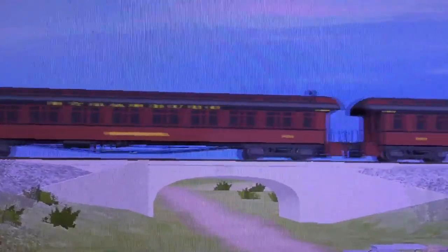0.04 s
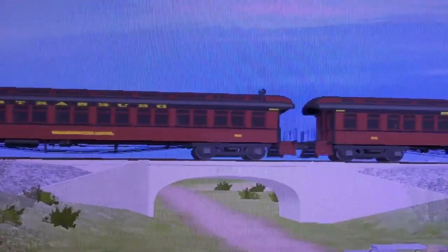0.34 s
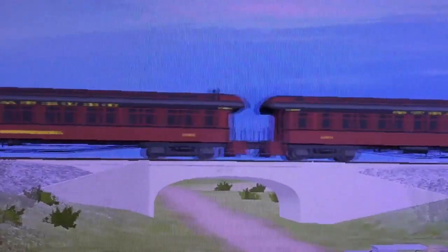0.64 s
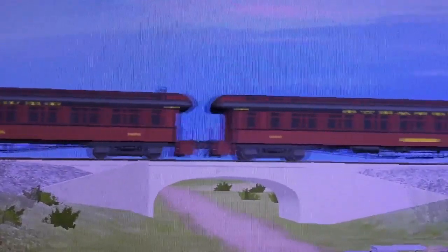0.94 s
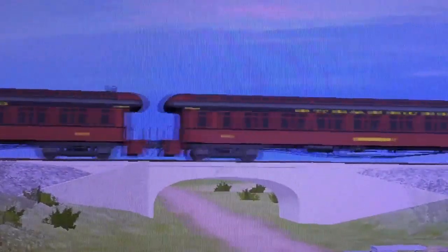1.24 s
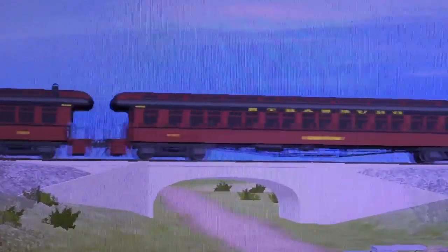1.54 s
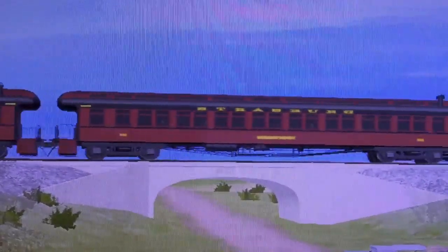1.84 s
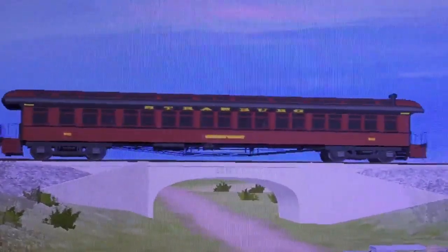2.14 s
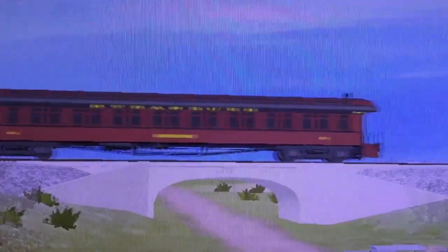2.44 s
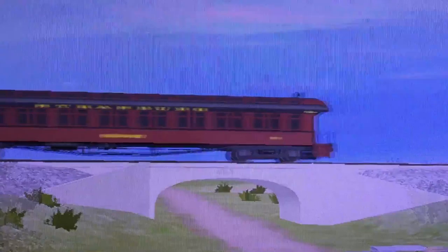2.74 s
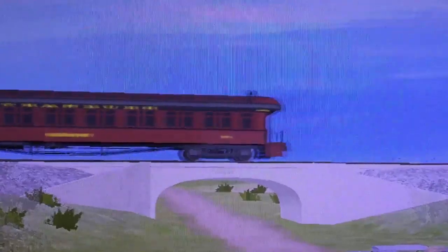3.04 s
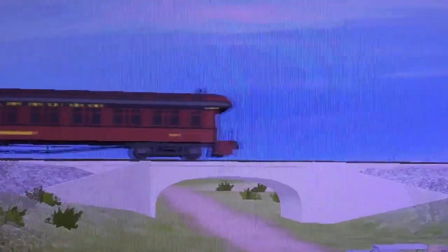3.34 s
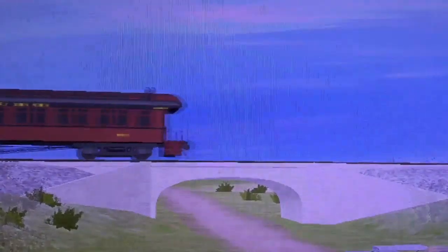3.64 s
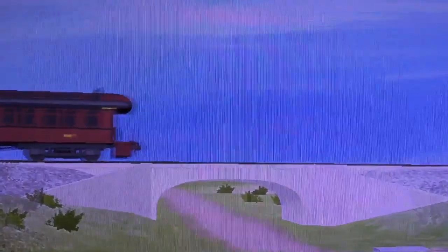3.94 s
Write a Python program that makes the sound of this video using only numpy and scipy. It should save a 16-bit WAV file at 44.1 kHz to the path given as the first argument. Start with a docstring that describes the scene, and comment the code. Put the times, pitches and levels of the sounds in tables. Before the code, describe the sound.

A model train rolls steadily along its track indoors, small bumps making the hollow baseboard drum and boom in a repeating rhythm. Wheels chatter and rails hiss in surges, with occasional light clunks and faint scrapes.

```python
"""A model train rolls steadily indoors, its small bumps making the hollow baseboard drum and boom.
The running gear repeats every 1.14 s: a fixed run of bumps and booms, and eight surges of contact force.
The surges drive board growl, wheel chatter and ringing, and rail hiss. Flanges scrape and car bodies
clunk now and then. A faint motor hum, a rumble and a steady hiss lie underneath."""
import sys
import numpy as np
from scipy import signal
from scipy.fft import rfft, irfft
from scipy.io import wavfile
from scipy.ndimage import uniform_filter1d

SR = 44100
rng = np.random.default_rng(int(sys.argv[2]) if len(sys.argv) > 2 else 0)


def generate_wav(signal):
    """Clip the signal to [-1, 1] and save it as 16-bit WAV at the path in sys.argv[1]."""
    frames = np.transpose(np.atleast_2d(signal))
    scaled = np.clip(frames, -1, 1) * 32767
    pcm = np.round(scaled).astype(np.int16)
    wavfile.write(sys.argv[1], SR, pcm)


N = 176400
T = np.arange(N) / SR
CYCLE_S = 1.13871


def amp(db):
    """Decibels to gain."""
    return 10 ** (np.asarray(db) / 20)


def unit(x):
    """Scale to unit rms."""
    return x / np.sqrt(np.mean(x ** 2) + 1e-20)


def add(mix, start_s, sound):
    """Mix a sound in at start_s."""
    part = mix[max(round(start_s * SR), 0):][:len(sound)]
    part += sound[:len(part)]


def colour(x, points):
    """Filter by (freq_hz, gain_db) points on a log-frequency axis; unit rms."""
    hz, db = np.transpose(points)
    log_freq = np.log(np.fft.rfftfreq(N, 1 / SR) + 1)
    return unit(irfft(rfft(x) * amp(np.interp(log_freq, np.log(hz), db)), N))


def resonate(x, modes):
    """Bank of narrow resonances, alternating in sign; unit rms."""
    f = np.fft.rfftfreq(N, 1 / SR) + 1
    response = sum((-1) ** k * amp(db) / (1 + 1j * (f * f - hz * hz) / (f * width_hz))
                   for k, (hz, width_hz, db) in enumerate(modes))
    return unit(irfft(rfft(x) * response, N))


def swell(dt, rise_s, fall_s):
    """Two-sided Gaussian, peak at dt = 0."""
    return np.exp(-.5 * (dt / np.where(dt < 0, rise_s, fall_s)) ** 2)


def cycle_offset_s(at_s):
    """Signed time from the nearest repeat of at_s."""
    return (T - at_s + CYCLE_S / 2) % CYCLE_S - CYCLE_S / 2


def flutter(depth_db, length_s):
    """Randomly wandering gain."""
    return amp(depth_db * unit(uniform_filter1d(rng.standard_normal(N), round(length_s * SR))))


def blow(modes, rise_s):
    """One soft blow on damped modes; unit peak."""
    t = T[:SR // 5]
    wave = sum(amp(db - 60 * t / t60_s) * np.sin(2 * np.pi * hz * t) for hz, db, t60_s in modes)
    wave *= 1 - np.exp(-(t / rise_s) ** 2)
    return wave / abs(wave).max()


def jangle(x, share=.5, t60_s=.06):
    """Many small metal parts ring briefly with the contact noise."""
    t = T[:SR // 8]
    tail = rng.standard_normal(len(t)) * amp(-60 * t / t60_s)
    ringing = signal.fftconvolve(x, tail / np.linalg.norm(tail))[:N]
    return np.sqrt(1 - share) * x + np.sqrt(share) * ringing


def roughness(repeat):
    """Contact noise: the repeat share of its power recurs each cycle, the rest is new."""
    worn = np.resize(rng.standard_normal(round(CYCLE_S * SR)), N)
    return np.sqrt(repeat) * worn + np.sqrt(1 - repeat) * rng.standard_normal(N)


def contact_force(column, rest_db, lag_s):
    """Eight surges per cycle over a steady rest level."""
    # force surges: peak_s, growl_db, chatter_db, hiss_db
    surges = [(0.135, -10, -0.5, -1.5), (0.27, -1.5, -2, -3), (0.426, 4, -2.5, -2), (0.555, -1.5, -0.5, 0),
              (0.7, 4, -1, -0.5), (0.841, -11, -2.5, -1.5), (0.984, 4, -0.5, 0), (1.134, 4, -1, -1.5)]
    index = {"growl": 1, "chatter": 2, "hiss": 3}[column]
    power = amp(rest_db) ** 2
    for row in surges:
        surge = swell(cycle_offset_s(row[0] + lag_s), rise_s=.021, fall_s=.04)
        power = power + amp(row[index]) ** 2 * surge
    return np.sqrt(power)


def background_hiss():
    """Faint steady hiss."""
    # hiss spectrum: freq_hz, gain_db
    spectrum = [(100, 12), (1000, 12), (2500, 11), (5000, 7), (7500, 1), (9500, 3), (10600, -3),
                (13000, -7), (15500, -15)]
    return amp(-72.5) * colour(rng.standard_normal(N), spectrum)


def motor_hum(pitch_hz=55.64, rms_db=-61):
    """The motor hums on one low sine."""
    return amp(rms_db) * np.sqrt(2) * np.sin(2 * np.pi * (pitch_hz * T + rng.random()))


def flange_scrapes():
    """Short bright bursts where a flange bites the rail."""
    # flange bites: peak_s, level_db
    bites = [(.54, -66), (.71, -75), (1.152, -71), (1.296, -67), (1.677, -66), (2.13, -70), (2.284, -73),
             (2.82, -66), (2.97, -72), (3.421, -68), (3.585, -68)]
    # scrape spectrum: freq_hz, gain_db
    spectrum = [(2500, -20), (3800, 3), (4600, 3), (5900, 7), (7100, -8), (7700, -16), (9500, -18),
                (12000, -38)]
    envelope = sum(amp(db) * swell(T - peak_s, rise_s=.009, fall_s=.018) for peak_s, db in bites)
    return envelope * colour(rng.standard_normal(N), spectrum)


def rails():
    """Metal rubs on metal: gritty hiss, and a different few rail modes chink in each surge."""
    # rubbing spectrum: freq_hz, gain_db
    spectrum = [(1000, -14.5), (1900, 2.5), (2400, 2), (2900, -2), (3600, -3), (4400, -7), (5000, -13.5),
                (6000, -16), (7000, -19.5), (7550, -24.5), (8100, -24.5), (9500, -22.5), (10600, -32),
                (15500, -52.5)]
    # rail modes: pitch_hz, bandwidth_hz, gain_db
    modes = [(2417, 7.8, -3.5), (2703, 53, 3.5), (3160, 26, -14), (3363, 55, 2.5), (3740, 28, -5),
             (3963, 42, -1.5), (4270, 99, -9.5), (5460, 53, -6.5), (5880, 33, -8.5), (6300, 42, -16),
             (7060, 58, -12.5)]
    rub = contact_force("hiss", rest_db=-3, lag_s=0.00086) * flutter(depth_db=2.27, length_s=0.0069)
    hiss = colour(jangle(rng.standard_normal(N) * rub), spectrum)
    force = contact_force("hiss", rest_db=-16, lag_s=-0.0032)
    chinks = 0
    for hz, width_hz, db in modes:
        drive = force * flutter(depth_db=3.2, length_s=.04) * rng.standard_normal(N)
        chinks = chinks + amp(db) * resonate(drive, [(hz, width_hz, 0)])
    return amp(-59) * hiss + amp(-63.5) * unit(chinks)


def rubbed_notes(trim_db=-1):
    """Now and then a wheel or rail is rubbed into one short, rasping note."""
    # wheel and rail notes: peak_s, pitch_hz, level_db
    notes = [(.015, 5538, -70), (.04, 1348, -50.5), (.429, 5415, -71), (.554, 1232, -54), (0.56, 1620, -51),
             (0.709, 1288, -54), (0.724, 3978, -68), (.728, 3353, -64), (.838, 3950, -69),
             (0.879, 3350, -62), (.973, 3330, -64), (.985, 2648, -63), (1.008, 1262, -51),
             (1.122, 1232, -52), (1.126, 1342, -48.5), (1.138, 5400, -73), (1.32, 1366, -52),
             (1.555, 1225, -65), (1.566, 5450, -72), (1.577, 4000, -72), (1.683, 5440, -76),
             (1.701, 1620, -47.5), (1.751, 3396, -65), (1.861, 3972, -65), (1.866, 3400, -69),
             (2.015, 3270, -68), (2.135, 1362, -56), (2.145, 3380, -63), (2.266, 1343, -51),
             (2.27, 1258, -49.5), (2.284, 5437, -68), (2.306, 1442, -49), (2.305, 2617, -58.5),
             (2.469, 1345, -53), (2.515, 2468, -61), (2.839, 1642, -51.5), (2.998, 3983, -71),
             (3.165, 3383, -66), (3.285, 3440, -71), (3.397, 1345, -53), (3.401, 2550, -63),
             (3.406, 1252, -49), (3.418, 5460, -69), (3.587, 5426, -78), (3.837, 1222, -58),
             (3.841, 5330, -70), (3.975, 1627, -52)]
    out = np.zeros(N + SR)  # 1 s lead-in
    dt = T[:SR // 4] - .1
    envelope = swell(dt, rise_s=.02, fall_s=.027)
    for peak_s, hz, db in notes:
        tone = np.sqrt(2) * np.sin(2 * np.pi * (hz * dt + rng.random()))
        add(out, 1 + peak_s + dt[0], amp(db + trim_db) * envelope * tone)
    return out[SR:] * unit(flutter(depth_db=3, length_s=0.0033))


def wheels():
    """Wheels chatter and ring with each surge."""
    # chatter spectrum: freq_hz, gain_db
    spectrum = [(450, -4), (700, -8.5), (830, -8.5), (1000, -6), (1120, -3.5), (1250, -7.5), (1500, -0.5),
                (1750, -4.5), (2100, -8), (2600, -20.5), (5000, -54)]
    # wheel modes: pitch_hz, bandwidth_hz, gain_db
    modes = [(640, 30, -7), (830, 60, -8), (975, 25, -9), (1058, 14, -7), (1235, 45, 0), (1346, 9, 5),
             (1457, 18, 2), (1635, 24, -5), (1833, 12, -11), (2048, 14, -9)]
    drive = roughness(repeat=0.51) * contact_force("chatter", rest_db=-7, lag_s=-0.0028)
    chatter = colour(jangle(drive), spectrum)
    ringing = resonate(roughness(repeat=0.96), modes)
    ringing *= contact_force("chatter", rest_db=-9, lag_s=0.0014)
    return amp(-50) * chatter + amp(-53.5) * unit(ringing)


def car_clunks():
    """Occasional hollow knocks of a car body."""
    # car body modes: pitch_hz, gain_db, t60_s
    modes = [(470.5, -1.5, 0.12), (538, -1, 0.16), (574.6, -0.5, 0.084), (625, -3.5, .12),
             (848, -17.5, 0.082)]
    # clunks: start_s, peak_db
    clunks = [(0.04, -39.5), (1.246, -34), (1.895, -40.5), (2.275, -38), (3.24, -39), (3.534, -39.5)]
    out, knock = np.zeros(N), blow(modes, rise_s=0.014)
    for start_s, db in clunks:
        add(out, start_s, amp(db) * knock)
    return out


def board_noise():
    """Fine roughness makes the baseboard growl and sound hollow, over a steady rumble."""
    # board spectra: freq_hz, gain_db
    growl_spectrum = [(100, -42.5), (128, -14.5), (148, 0.5), (170, -0.5), (192, -1.5), (208, -5),
                      (245, -4), (290, -3.5), (385, -4.5), (410, -7.5), (450, -11), (560, -28), (1100, -70)]
    hollow_spectrum = [(350, -16.5), (425, 1.5), (480, -1.5), (505, 6.5), (545, -6.5), (585, -11),
                       (630, -6), (710, -23.5), (1100, -68)]
    rumble_spectrum = [(15, -55), (26, -29), (38, -8), (47, -5), (64, 2), (75, 0), (88, -4.5), (104, -4),
                       (125, -17), (200, -22), (500, -52.5)]
    growl_drive = roughness(repeat=0.81) * contact_force("growl", rest_db=3, lag_s=0.0013)
    hollow_drive = roughness(repeat=0.82) * contact_force("chatter", rest_db=-1.5, lag_s=-0.0013)
    growl = amp(-42) * colour(growl_drive, growl_spectrum)
    hollow = amp(-51) * colour(hollow_drive, hollow_spectrum)
    rumble = amp(-57) * colour(roughness(repeat=0.2), rumble_spectrum)
    return growl + hollow + rumble


def board_booms(trim_db=-0.64, skew=0.96):
    """Passing wheels swell the baseboard into short notes; pitch depends on where they load it."""
    # booms per cycle: peak_s, pitch_hz, level_db, width_s
    booms = [(.05, 343, -41, 0.041), (.085, 308, -40.5, 0.031), (.13, 184.4, -43.5, 0.029),
             (.15, 335, -37.5, 0.023), (.15, 367.7, -35.5, 0.024), (.195, 163, -42.5, 0.041),
             (.215, 303, -41, 0.022), (.295, 379, -38.5, 0.057), (.32, 312, -42.5, 0.029),
             (.365, 181, -40, 0.025), (.43, 306, -42, 0.02), (.445, 156.5, -45.5, .04),
             (.46, 347.2, -40.5, 0.051), (.535, 373, -50.5, 0.043), (.545, 322, -42.5, 0.059),
             (.555, 167, -40, 0.04), (.57, 515, -44.5, 0.021), (.585, 295, -42, 0.022),
             (.7, 382, -39.5, 0.018), (.71, 190, -41, 0.042), (.71, 337, -39.5, 0.029),
             (.72, 157, -45.5, 0.035), (.785, 281, -41.5, 0.015), (.83, 507.6, -49, 0.047),
             (.845, 312, -40.5, 0.044), (.86, 172, -45.5, 0.022), (.895, 349, -49, 0.047),
             (.955, 376, -39.5, 0.028), (.975, 172, -41.5, 0.038), (.995, 285, -38.5, 0.069),
             (1.0, 325, -35.5, 0.024), (1.03, 380.5, -37, 0.016), (1.13, 379.2, -32.5, 0.039),
             (1.065, 158.4, -42, 0.024), (1.13, 163.3, -42, 0.028), (1.145, 324.3, -36, 0.052)]
    out = np.zeros(N)
    for peak_s, hz, db, width_s in booms:
        dt = cycle_offset_s(peak_s)
        envelope = swell(dt, rise_s=width_s * skew, fall_s=width_s / skew)
        out += amp(db + trim_db) * envelope * np.sqrt(2) * np.sin(2 * np.pi * hz * dt)
    return out


def board_bumps(trim_db=-5.5, spread_db=1.05):
    """The same bumps strike the baseboard each cycle, never quite equally hard."""
    # baseboard modes: pitch_hz, gain_db, t60_s
    modes = [(156, -16.5, 0.2), (164.3, -13.5, 0.2), (310.8, -1.5, .12), (340.3, -2.5, 0.14),
             (377.9, -3, 0.2), (423, -3.5, 0.028), (489, -3.5, 0.016), (595, -7.5, 0.033)]
    # bumps per cycle: start_s, level_db
    bumps = [(0.0023, -26), (0.037, -38.5), (0.066, -22.5), (0.0996, -24), (0.1103, -37.5), (0.1268, -28.5),
             (0.1387, -37), (0.146, -28.5), (0.247, -26), (0.2675, -24), (0.2901, -42.5), (0.3187, -34.5),
             (0.407, -27.5), (0.4389, -31.5), (0.5262, -26), (0.5519, -28), (0.5755, -30), (0.6457, -30),
             (0.678, -42), (0.6836, -32), (0.8068, -29), (0.8299, -28), (0.8425, -35), (0.8751, -23.5),
             (0.924, -23), (0.937, -36.5), (0.9439, -26), (0.9716, -32), (0.9776, -26), (0.996, -28),
             (0.9997, -33), (1.0111, -39), (1.0185, -43), (1.0942, -21), (1.0995, -37.5), (1.1316, -23)]
    out = np.zeros(N + SR)  # 1 s lead-in
    knock = blow(modes, rise_s=0.0035)
    for cycle_start_s in np.arange(-CYCLE_S, T[-1], CYCLE_S):
        for start_s, db in bumps:
            peak_db = db + trim_db + spread_db * rng.standard_normal()
            add(out, 1 + cycle_start_s + start_s, amp(peak_db) * knock)
    return out[SR:]


def scene():
    """The train over a faint hiss, mono."""
    # slow drift of wheel and rail noise as the cars go by: time_s, gain_db
    drift = [(0, 0.5), (.4, -0.4), (1.0, 0.7), (1.3, 0.6), (1.5, 0.5), (1.7, 0.7), (2.3, 0.55), (2.65, 0),
             (3.1, -0.7), (3.42, 0.1), (3.75, -0.5), (4, 0)]
    drift_gain = amp(np.interp(T, *np.transpose(drift)))
    lows = board_bumps() + board_noise() + motor_hum() + board_booms() + car_clunks()
    metal = drift_gain * (wheels() + rails()) + rubbed_notes() + flange_scrapes()
    return (lows + metal + background_hiss())[None]


def record(dry, low_cut_hz=33, high_cut_hz=15750):
    """Bass roll-off and treble band limit."""
    highpass = signal.butter(4, low_cut_hz, "highpass", fs=SR, output="sos")
    lowpass = signal.firwin(511, high_cut_hz, window=("kaiser", 9), fs=SR)
    return signal.oaconvolve(signal.sosfilt(highpass, dry), lowpass[None], "same")


dry = scene()
out = record(dry)
generate_wav(out)
```